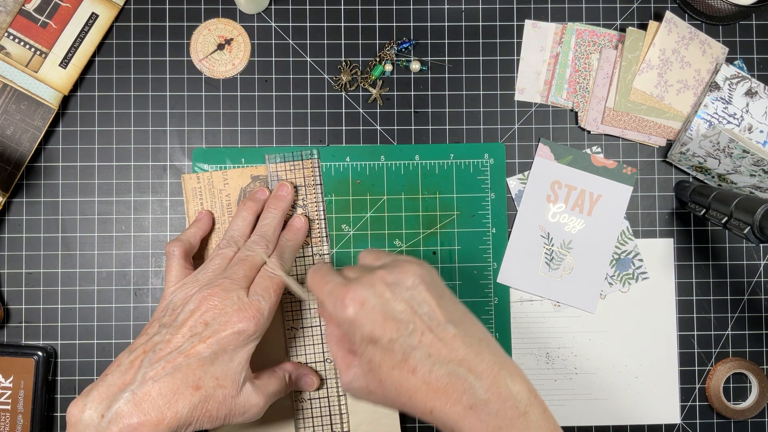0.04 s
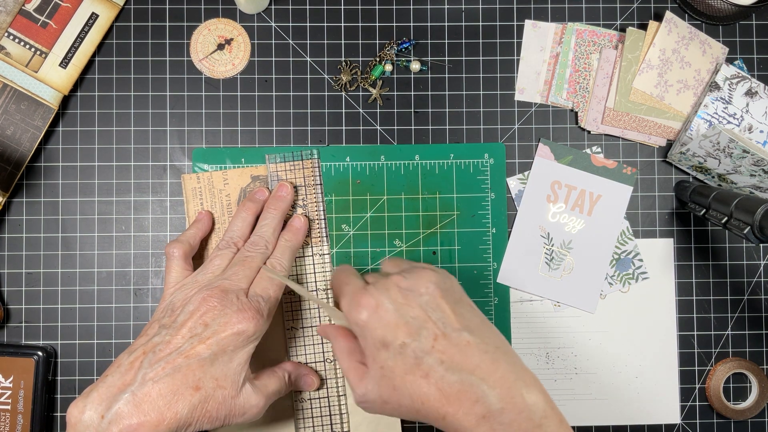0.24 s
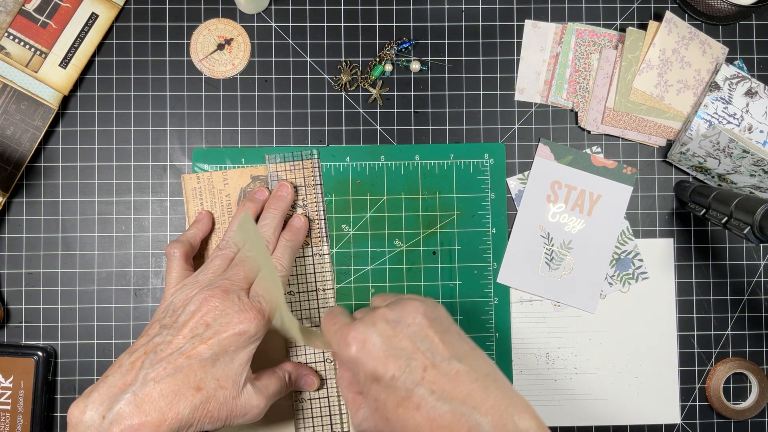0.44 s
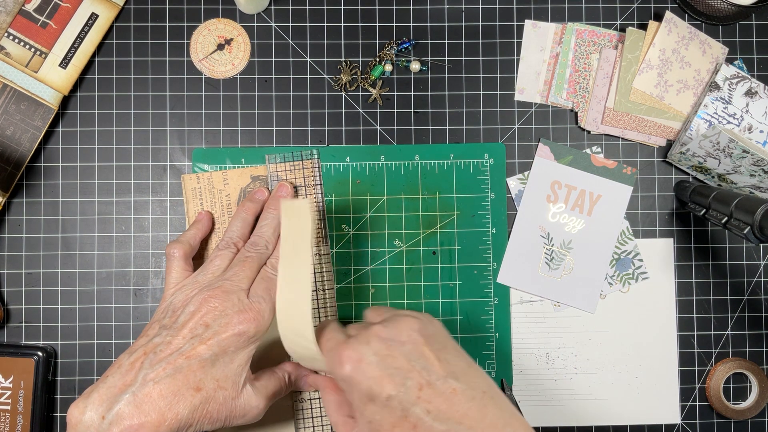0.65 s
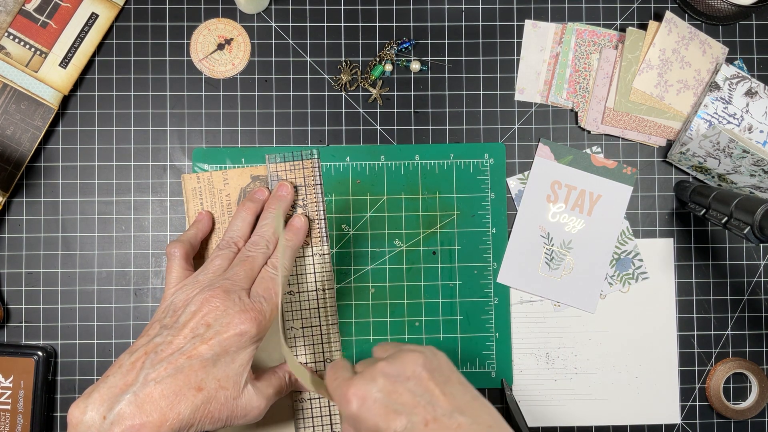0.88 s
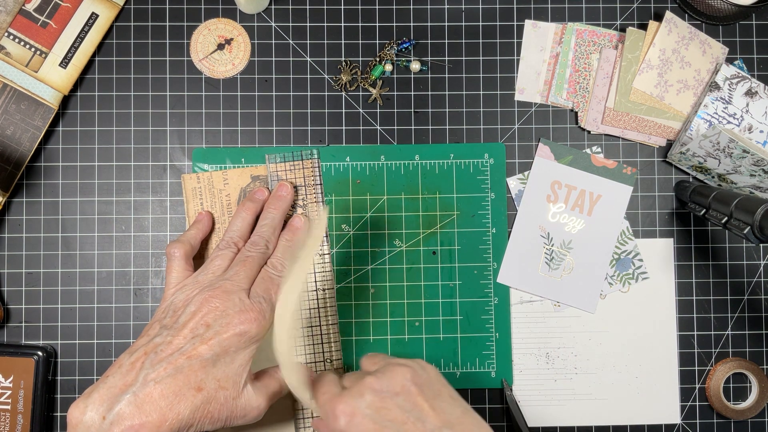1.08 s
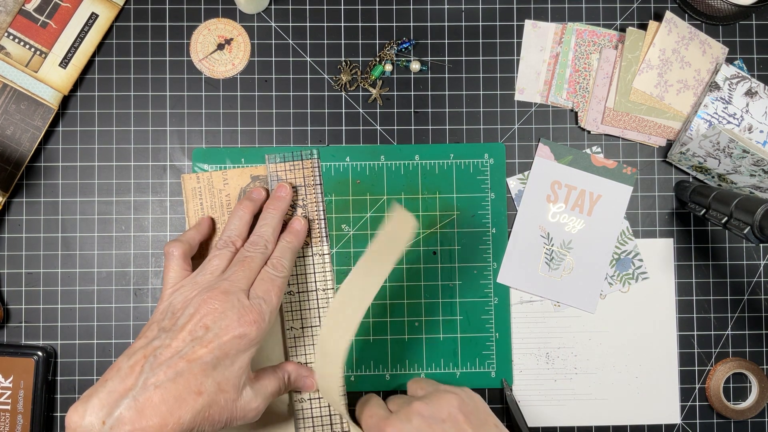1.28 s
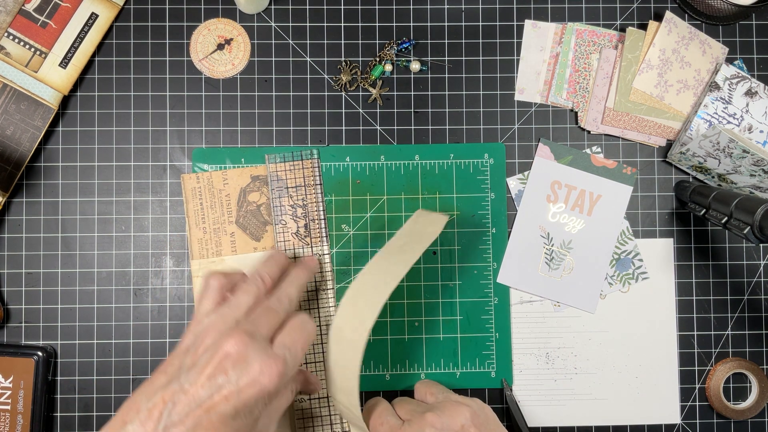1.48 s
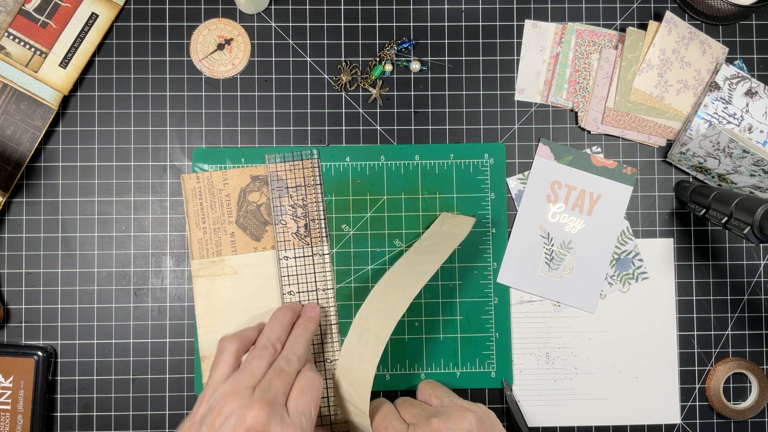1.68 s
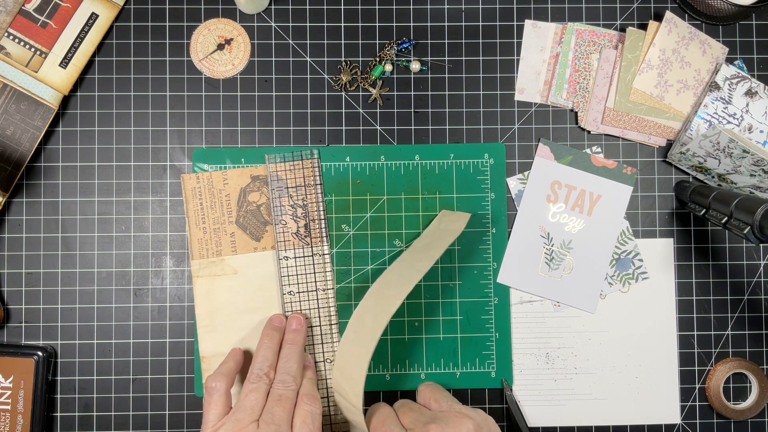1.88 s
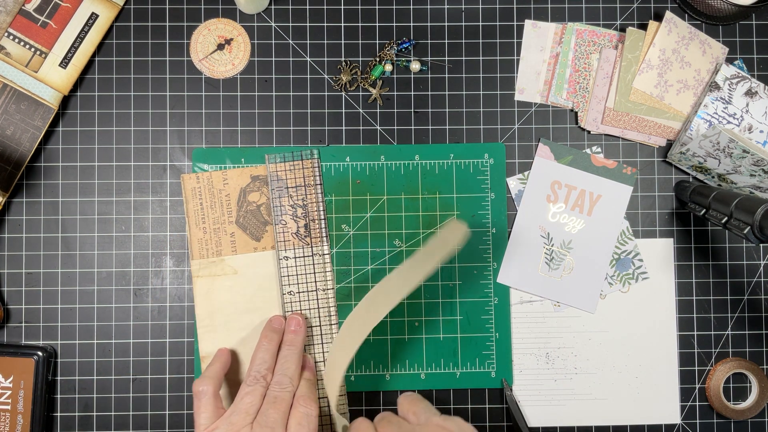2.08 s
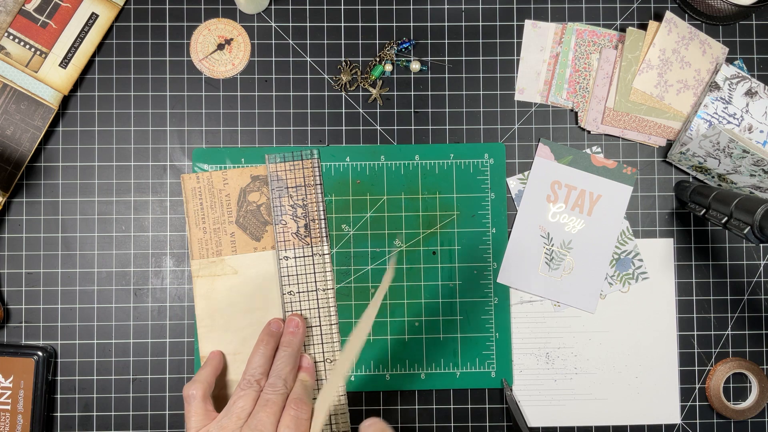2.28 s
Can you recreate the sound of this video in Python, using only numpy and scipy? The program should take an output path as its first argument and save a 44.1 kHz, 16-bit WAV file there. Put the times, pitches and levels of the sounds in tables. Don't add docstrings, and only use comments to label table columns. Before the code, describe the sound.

Close, dry rips of a paper strip, half a second apart, with sharp fibre snaps and soft hissing rubs between; a quieter stretch of light brushing follows, then a fourth thin tear over faint room rumble.

```python
import sys
import numpy as np
from scipy import signal
from scipy.io import wavfile

SR = 44100
rng = np.random.default_rng(int(sys.argv[2]) if len(sys.argv) > 2 else 0)


def volts_from_decibels(level):
    exponent = np.asarray(level, float) / 20
    return 10 ** exponent


def master_out(mix):
    frames = np.transpose(np.atleast_2d(mix))
    ceiling = np.clip(frames, -1, 1)
    pcm = np.round(ceiling * 32767).astype(np.int16)
    wavfile.write(sys.argv[1], SR, pcm)


N = 102929


def rms_one(x):
    return x / np.sqrt(np.mean(x ** 2) + 1e-20)


def in_time(tables):
    rows = []
    for table in tables:
        first, last = table[0], table[-1]
        rows += [(first[0] - .003, -110, first[2]), *table, (last[0] + .03, -110, last[2])]
    s, *columns = np.transpose(sorted(map(tuple, rows)))
    return [np.interp(np.arange(N) / SR, s, column) for column in columns]


def at_hz(points, hz):
    points_hz, points_db = np.array(points)[:, 0], np.array(points)[:, 1]
    return np.interp(np.log(hz), np.log(points_hz), points_db)


def drift(rate_hz):
    r = np.exp(-16 * np.pi * rate_hz / SR)
    slow = signal.lfilter([1], [1, -2 * r, r * r], rng.standard_normal(N // 8 + 4002))
    slow = slow[4000:]
    return np.interp(np.arange(N) / 8, np.arange(len(slow)), rms_one(slow))


def resonate(x, hz, width_hz):
    r = np.exp(-np.pi * width_hz / SR)
    zeros = np.array([1, 0, -1]) * (1 - r * r) / 2
    poles = [1, -2 * r * np.cos(2 * np.pi * hz / SR), r * r]
    return signal.lfilter(zeros, poles, x + 1e-18)


def banded_noise(spectrum, patchy_db, tilt_db):
    out, white = 0, rng.standard_normal((2, N))
    edges_hz = 25 * 2 ** np.arange(0, 9.5, 1 / 3)
    for k, (low, high) in enumerate(zip(edges_hz, edges_hz[1:])):
        hz = np.sqrt(low * high)
        level_db = at_hz(spectrum, hz)
        if level_db < -44 and hz < 300 or level_db < -70:
            continue
        band = signal.sosfilt(signal.butter(2, [low, high], "band", fs=SR, output="sos"), white[k % 2])
        out = out + band * volts_from_decibels(level_db + patchy_db * drift(14) + tilt_db * np.log2(hz / 4500))
    return rms_one(out)


def ventilation():
    # frequency in Hz, spectral density in dB per Hz.
    rumble = [(26, -45), (45, -19), (150, -3.5), (247, -18.5), (290, -31.5), (323, -23.5), (438, -32.5),
              (600, -42), (780, -67.5), (1320, -120)]
    hiss = [(350, -31), (600, -0.5), (1960, -16), (4650, -8.5), (16000, -24)]
    rumble_db, hiss_db = -54.5, -77.5
    return volts_from_decibels(rumble_db) * banded_noise(rumble, 0.39, 0) + volts_from_decibels(hiss_db) * banded_noise(hiss, 1.2, 0)


def sliding():
    # start in s, stop in s, first level in dB, last level in dB, tilt in dB per octave.
    strokes = [(0, 0.033, -37.5, -71, 1), (0.098, 0.283, -50, -54, 0.5), (0.265, 0.4, -56, -47, 3.5),
               (0.37, 0.486, -91, -39.5, 1.2), (0.575, 0.708, -50, -51.5, -1),
               (0.675, 0.854, -53.5, -53, 1.4), (0.848, 0.904, -67.5, -60, 2.5), (1, 1.23, -50.5, -55.5, 0),
               (1.207, 1.378, -53, -60, 3), (1.359, 1.477, -61, -67, -0.6), (1.465, 1.562, -66, -60.5, 1.3),
               (1.549, 1.649, -60, -78.5, 1.5), (1.66, 1.699, -52.5, -61, -0.1),
               (1.691, 1.877, -72.5, -82.5, -3), (1.855, 1.98, -56, -57, -0.8),
               (1.963, 2.047, -56.5, -54, -1.5), (2.027, 2.174, -74, -63, -5.5),
               (2.28, 2.354, -55, -60.5, -4.5)]
    # frequency in Hz, density in dB per Hz.
    strip_spectrum = [(290, -44.5), (500, -6.5), (868, -8.5), (1030, -2.5), (3050, -5), (3860, 1),
                      (12300, -8.5), (16000, -13)]
    palm_spectrum = [(350, -44.5), (600, -16.5), (894, -16), (1430, -7), (3200, -11.5), (4300, -2),
                     (13400, -6.5), (16000, -7.5)]
    # middle in s, length in s, pitch in Hz, level over the rub in dB.
    strip_rings = [(0.613, .04, 4540, -1.5), (0.785, .07, 3750, 4.5), (0.803, .07, 7600, 8.5),
                   (0.801, .08, 10800, -3.5), (1.179, .09, 7320, 5), (1.22, .04, 4300, 0),
                   (1.271, .05, 5840, 2), (1.51, .09, 4600, 8), (1.535, .05, 6080, 6.5),
                   (1.552, .05, 11580, 3), (1.69, .03, 5300, 6), (1.897, .06, 5230, 1),
                   (1.978, .07, 5500, -1), (2, .05, 8330, 0), (1.92, .04, 8800, 2)]
    # frequency in Hz, width in Hz, level in dB.
    mat_rings = [(4200, 350, -6.5), (5300, 250, -8)]
    edge_s, palm_from_s, patch_db = 0.036, 1.365, 2.4

    t = np.arange(N) / SR
    power, bright_db = np.zeros(N), np.zeros(N)
    for start, stop, first_db, last_db, tilt_db in strokes:
        on = np.clip(np.minimum(t - start, stop - t) / edge_s + .5, 0, 1) ** 2
        level_db = np.interp(t, [start, stop], [first_db, last_db])
        power += (on * volts_from_decibels(level_db)) ** 2
        bright_db += on * (tilt_db - bright_db)
    strip = banded_noise(strip_spectrum, patch_db, bright_db)
    palm = banded_noise(palm_spectrum, patch_db, bright_db)
    rub = np.where(t < palm_from_s, strip, palm)
    rub = rub + sum(volts_from_decibels(db) * resonate(rub, hz, width_hz) for hz, width_hz, db in mat_rings)
    rings = 0
    for middle, length, hz, db in strip_rings:
        swell = np.exp(-4 * ((t - middle) / length) ** 2)
        rings = rings + volts_from_decibels(db) * swell * resonate(rub, hz, hz * .06)
    return np.sqrt(power) * rms_one(rub + rings)


def tearing():
    # time in s, tearing effort in dB, pitch of the taut strip in Hz.
    pulls = [
        [(.021, -45.5, 4700), (.033, -43, 4700), (.035, -34.5, 4740), (.08, -27, 4300), (.1, -23.5, 4500),
         (.108, -25.5, 3050), (.12, -27, 2950), (.132, -33, 2940), (.165, -54, 2980)],
        [(.479, -37, 4400), (.482, -29, 6500), (.499, -32, 6000), (.515, -29, 5000), (.532, -24.5, 5300),
         (.568, -26.5, 4674), (.574, -39.5, 4500), (.6, -60, 4510)],
        [(.884, -55, 5640), (.9235, -38, 5750), (.9255, -32.5, 5800), (.968, -28, 4700), (.992, -29, 4150),
         (.998, -34.5, 4440), (1.045, -62, 4800)],
        [(2.159, -53, 8400), (2.163, -39.5, 8600), (2.195, -30, 8260), (2.2, -32, 4180), (2.25, -29.5, 4740),
         (2.264, -36, 4500), (2.27, -46.5, 4400), (2.3, -56, 4030)],
    ]
    # frequency in Hz, density in dB per Hz.
    sheet_1 = [(180, -42), (300, -16.5), (1150, -18.5), (1300, -8), (1660, -12), (4160, -0.5),
               (16000, -8.5)]
    sheet_2 = [(180, -67), (300, -31.5), (1530, -9), (1970, -13), (2650, -3), (10900, -9), (16000, -15)]
    sheet_3 = [(180, -55.5), (300, -26), (1250, -10.5), (1510, -5), (2480, -10), (5250, -4), (16000, -9)]
    sheet_4 = [(250, -49), (340, -7.5), (420, -23), (860, -17), (1260, -5), (1620, -5), (4490, -7),
               (16000, -3.5)]
    # frequency in Hz, width in Hz, level in dB.
    body = [
        (760, 90, 2.5),
        (1500, 110, -2.5),
        (2980, 133, 5.5),
        (345, 23, 2.5),
    ]
    fibres_per_s, fibre_spread_db, fibre_cycles = 32000, 2.6, 40.0
    clumps_per_s, clump_s, clump_db = 175, .0025, 7
    taut_db, taut_octaves, patch_db = 3.5, 0.43, 6
    edge_db, edge_octaves = 5, 0.047
    bass_follows, bass_below_hz = 0.19, 4100

    effort_db, taut_hz = in_time(pulls)
    which = np.searchsorted([pull[0][0] - .05 for pull in pulls[1:]], np.arange(N) / SR)

    slips = np.cumsum(clumps_per_s / SR * volts_from_decibels(3 * drift(60)))
    kicks = np.diff(np.floor(slips), prepend=0) * rng.uniform(.3, 1.3, N)
    decaying = signal.lfilter([1], [1, -np.exp(-1 / (clump_s * SR))], kicks)
    clump = volts_from_decibels(clump_db * decaying.clip(0, 1.6))

    happens = rng.random(N) < fibres_per_s / SR
    strength = volts_from_decibels(fibre_spread_db * rng.exponential(1, N).clip(0, 4))
    breaks = happens * strength * rng.choice([-1, 1], N)

    dealt, out = rng.integers(0, 15, N), 0
    for k, hz in enumerate(np.geomspace(280, 15800, 90)):
        colour_db = np.array([at_hz(s, hz) for s in (sheet_1, sheet_2, sheet_3, sheet_4)])[which]
        octaves = np.log2(hz / taut_hz)
        near_db = taut_db * np.exp(-.5 * (octaves / taut_octaves) ** 2)
        near_db = near_db + edge_db * np.exp(-.5 * (octaves / edge_octaves) ** 2)
        depth = np.clip(np.log2(bass_below_hz / hz), 0, 1)
        bass_db = bass_follows * (effort_db + 28.5).clip(-30, 3) * depth
        gain = clump * volts_from_decibels(bass_db + colour_db + near_db + patch_db * drift(24).clip(-3, 1.6))
        out = out + resonate(breaks * gain * (dealt == k % 15), hz, hz / fibre_cycles + 45)

    hums = [volts_from_decibels(db) * resonate(out * (which == k), hz, width_hz) for k, (hz, width_hz, db) in enumerate(body)]
    out = out + sum(hums)
    pull_rms = np.sqrt([np.mean(out[which == k] ** 2) for k in range(len(pulls))])[which]
    return volts_from_decibels(effort_db) * out / pull_rms


def snaps():
    # time in s, peak in dB, pitch in Hz, share of wide crack
    # in dB.
    snap_events = [(0.022, -30, 4750, -13), (0.0345, -20, 6600, 7.5), (0.052, -12, 4950, 6),
                   (0.077, -22, 4070, 9), (0.096, -13, 4230, 7.5), (0.108, -7, 2790, 0), (0.112, -7, 2760, -18.5),
                   (0.118, -8, 2910, -10), (0.384, -44, 2597, 13), (0.422, -52.5, 1500, 18),
                   (0.445, -42, 5300, -1), (0.449, -32.5, 5200, 5), (0.461, -28.5, 6000, 8.5),
                   (0.508, -3, 3120, 6), (0.646, -39, 2420, 15), (0.658, -28, 1520, -6),
                   (0.672, -32.5, 1450, -1.5), (0.681, -41.5, 6000, 12.5), (.682, -26.5, 2900, -5),
                   (0.887, -36, 5500, 2), (0.892, -31, 5530, 6), (0.912, -17.5, 5800, 3),
                   (1.011, -29.5, 5460, 12),
                   (0.0409, -16.5, 4540, -2.5), (0.3725, -43, 2200, 18), (0.4704, -20, 4200, 9.5),
            (0.5002, -10, 4200, 9), (0.5098, -10, 5500, -2), (0.9247, -11, 6200, 0.5), (1.03, -31, 7150, 7),
            (1.103, -36.5, 3020, 19.5), (1.1044, -42, 6000, 10), (1.576, -49.5, 3510, 2),
            (1.662, -29.5, 4220, -4), (1.9028, -47.5, 2500, 14.5), (1.902, -39, 6000, 7),
            (2.1126, -52.5, 8540, 13.5), (2.113, -59.5, 2980, 9), (2.1492, -38, 2950, 13.5),
            (2.161, -18.5, 8600, 0), (2.171, -18, 8300, 6), (2.179, -19, 7840, 8), (2.222, -18, 4500, 10.5),
            (2.232, -18, 4500, 7.5), (2.244, -20, 5170, 10),
                   (.046, -21, 4360, -3), (.126, -10.5, 3160, -9), (.139, -26, 3030, -5), (.254, -38, 3030, 5),
             (.433, -46, 5000, 2.5), (.444, -41, 10500, 7.5), (.659, -32.5, 3570, -0.5),
             (.686, -27.5, 4400, -6), (.7, -41, 4500, -3), (.713, -39, 4360, 5), (.726, -39, 3950, -5),
             (.775, -40, 2820, 3), (.84, -49, 2200, 14), (.883, -46, 9000, 11), (.906, -32, 8500, 10),
             (.916, -19, 6170, 2), (.947, -15.5, 5500, 0), (.954, -18, 4400, 3), (.963, -16, 8200, 2),
             (.97, -18, 5500, 8), (1.335, -51, 10600, 11.5), (1.912, -46, 7000, 9),
             (2.138, -61.5, 8000, 14), (2.164, -26.5, 2300, -7), (1.654, -45.5, 4500, 2),
             (2.198, -20, 3540, -4), (2.213, -22, 6000, 3), (2.249, -27, 5000, 3), (2.263, -27, 4500, 8)]
    ring_width, crack_down, crack_up = 0.2, 2.4, 2.25
    decay_ms, decay_shape, trim_db = 2.23, 0.98, -10.5

    rows, out = snap_events, np.zeros(N + 2000)
    spray, t = rng.standard_normal((len(rows), 1500)), np.arange(1500) / SR
    envelope = np.exp(-(t * 1000 / decay_ms) ** decay_shape) * np.minimum(t / 0.00036, 1)
    for (s, db, hz, wide_db), noise in zip(rows, spray):
        burst = noise * envelope
        ringing = resonate(resonate(burst, hz, hz * ring_width), hz, hz * ring_width * 2)
        limits_hz = [hz / crack_down, min(hz * crack_up, 16000)]
        crack = signal.sosfilt(signal.butter(3, limits_hz, "band", fs=SR, output="sos"), burst)
        both = ringing / abs(ringing).max() + volts_from_decibels(wide_db) * crack / abs(crack).max()
        start = int(s * SR)
        out[start:start + 1500] += volts_from_decibels(db + trim_db) * both
    return out[:N]


def room(x):
    t60_s, wall_cut_hz = 0.2, 3200
    out, dull = np.zeros(N), np.exp(-2 * np.pi * wall_cut_hz / SR)
    lags = (rng.uniform(.006, .03, 10) * SR).astype(int)
    for k, lag in enumerate(lags):
        loop, gain, state = x.copy(), volts_from_decibels(-60 * lag / SR / t60_s), [0.]
        for i in range(lag, N, lag):
            back, state = signal.lfilter([gain * (1 - dull)], [1, -dull], loop[i - lag:i], zi=state)
            loop[i:i + lag] += back[:N - i]
        out += (loop - x) * (-1) ** k
    return out


def scene():
    air = ventilation()
    rubbing = sliding()
    paper = tearing() + snaps()
    room_db = -15.5
    return (paper + volts_from_decibels(room_db) * room(paper) + rubbing + air)[None]


def band_limit(x):
    return signal.sosfilt(signal.butter(12, 16630, fs=SR, output="sos"), x)


def record(dry):
    low_cut = signal.butter(4, 50, "high", fs=SR, output="sos")
    top_cut = signal.cheby2(14, 60, 16350, fs=SR, output="sos")
    mix = signal.sosfilt(np.vstack([low_cut, top_cut]), dry)
    return band_limit(mix)


dry = scene()
out = record(dry)
master_out(out)
```